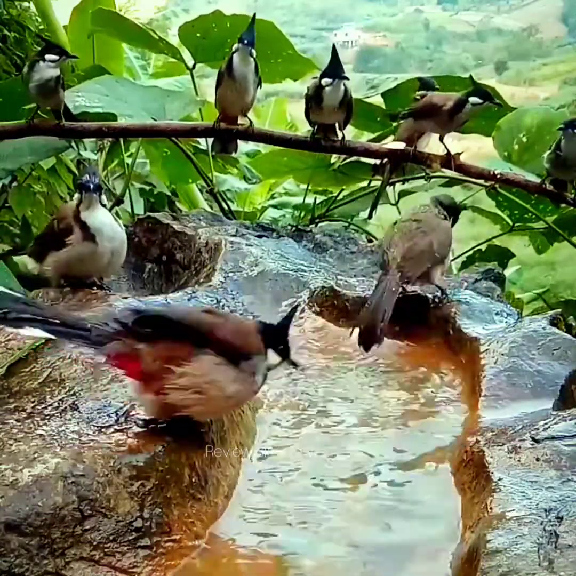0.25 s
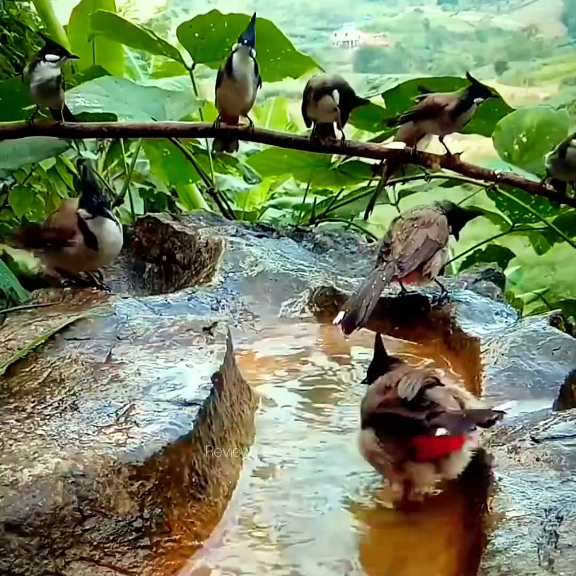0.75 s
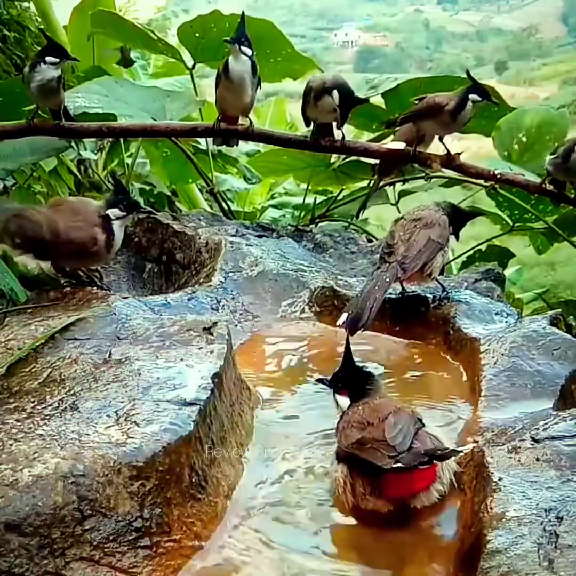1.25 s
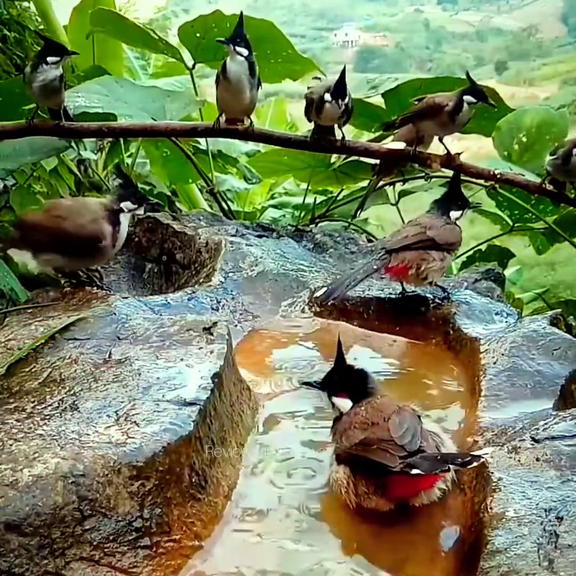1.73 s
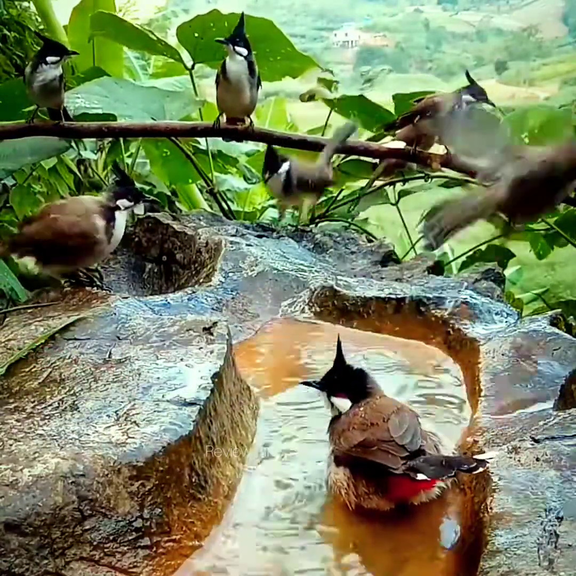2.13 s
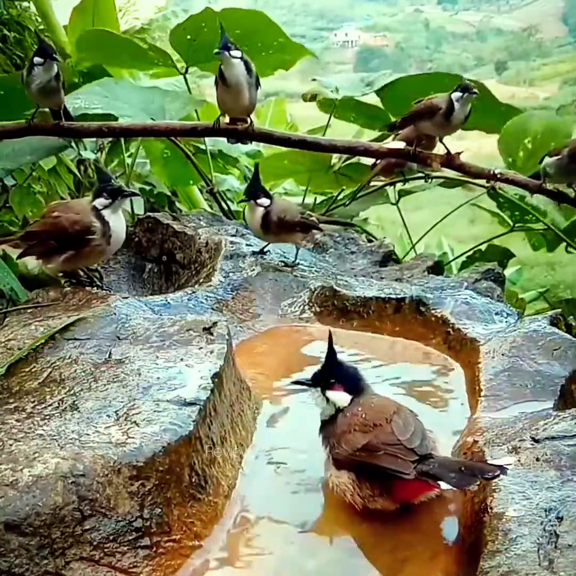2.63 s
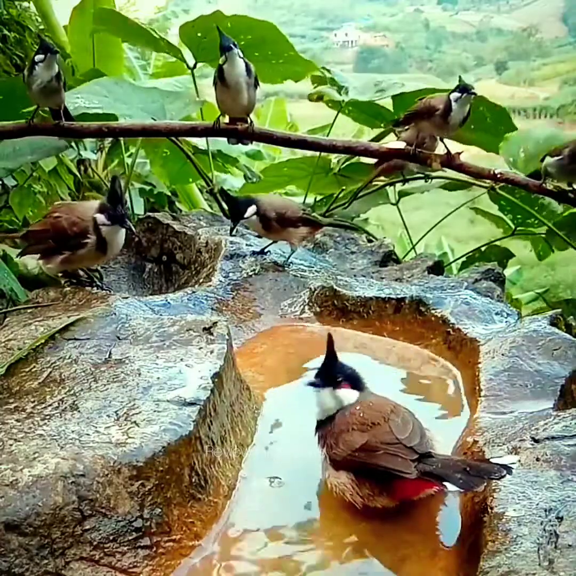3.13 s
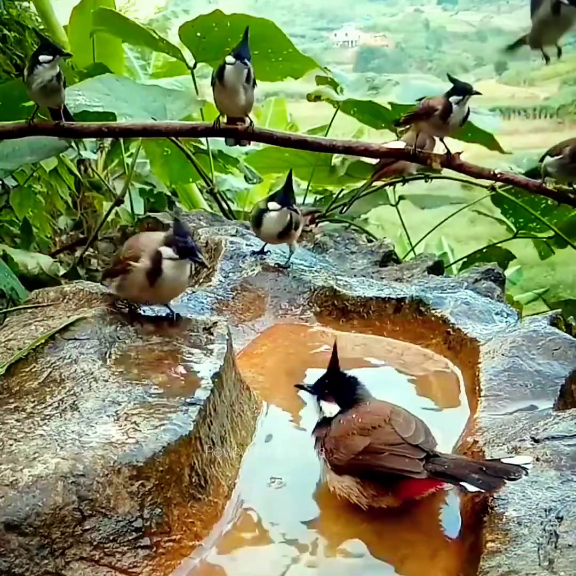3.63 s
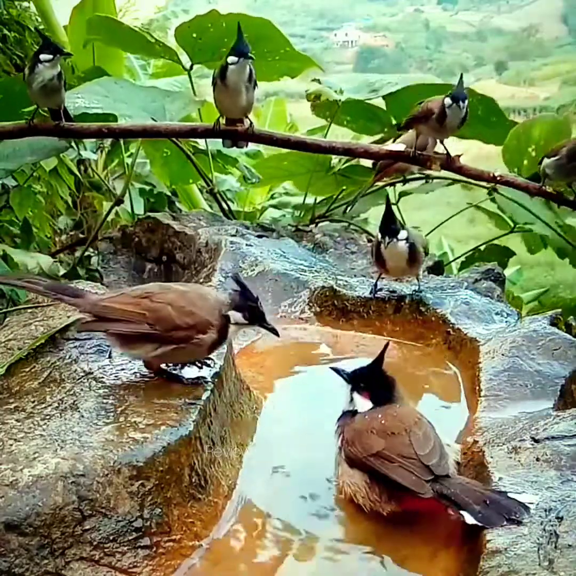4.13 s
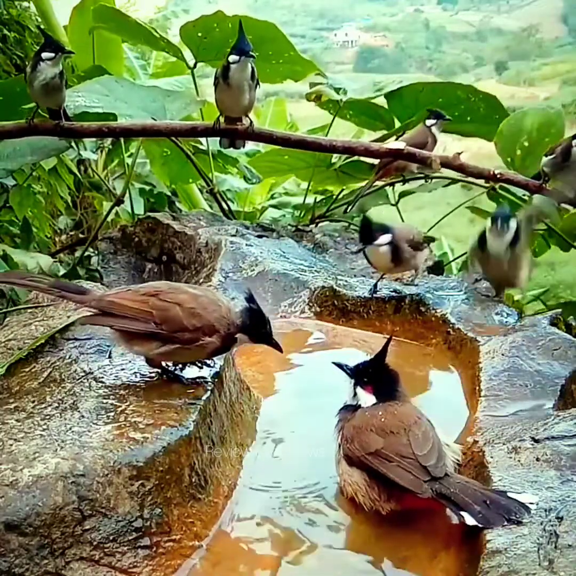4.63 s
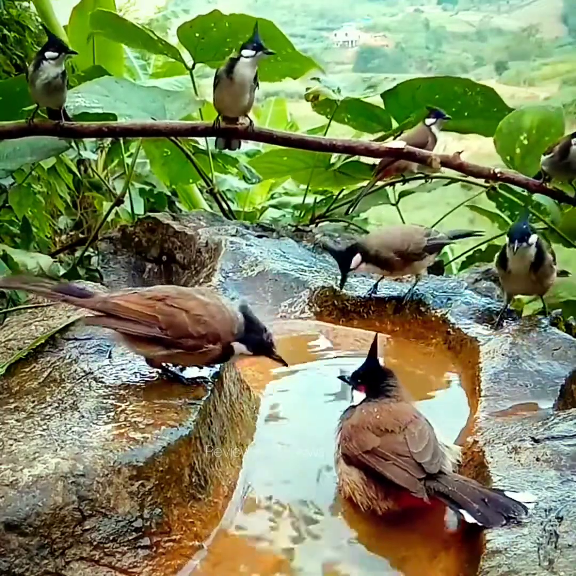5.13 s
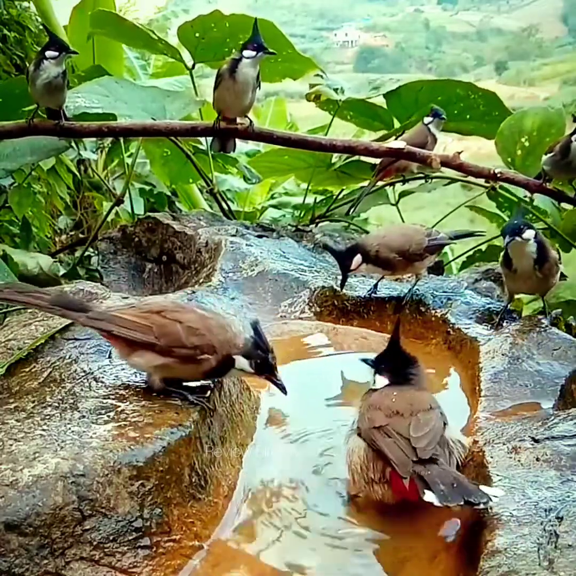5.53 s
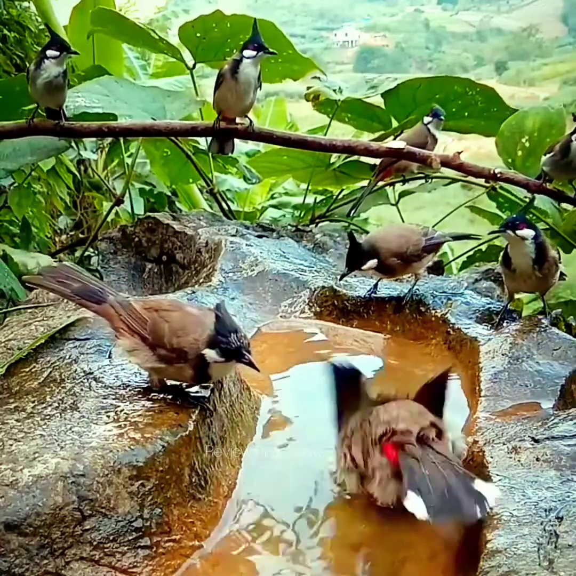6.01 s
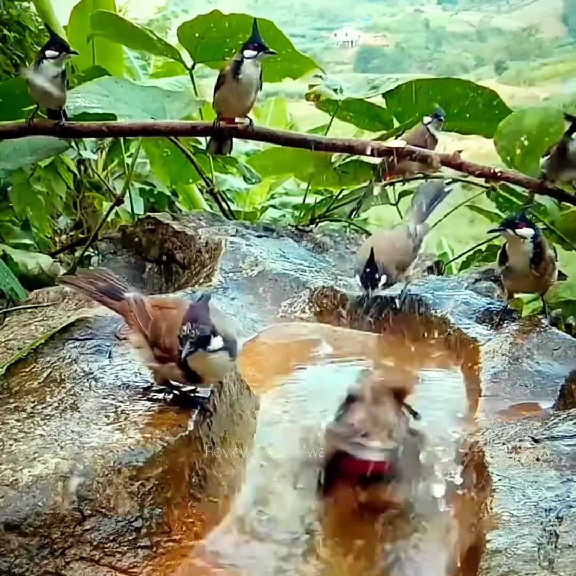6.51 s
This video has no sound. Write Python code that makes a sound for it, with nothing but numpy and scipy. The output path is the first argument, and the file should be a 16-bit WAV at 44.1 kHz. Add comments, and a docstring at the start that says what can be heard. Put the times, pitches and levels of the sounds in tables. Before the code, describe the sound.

Close to a phone microphone outdoors, a small bird flaps into a shallow rock pool with crisp wet slaps and spray. Quieter moments follow, with a hoarse chatter, then a flutter and a loud, bending chirp. Another flutter brings low, throbbing air bumps. A long lull holds a thin, high insect trill and faint distant calls before vigorous splashing breaks out near the end.

```python
"""A shallow rock pool outdoors, close to a phone, where small birds bathe, hop and flap.
Spray is a patter of noise grains and ringing bubbles; wings slap, clap and swish as shaped noise.
Low noise and wavering low tones are the air that wings push at the microphone. Near and far birds
whistle in bending tones, and one chatters in pips. An insect in the leaves trills in uneven bursts
of 6 kHz pulses. Echoes of the whistles and a soft noise of far-off leaves lie behind."""
import sys
import numpy as np
from scipy import signal
from scipy.fft import rfft, irfft, next_fast_len
from scipy.io import wavfile
from scipy.ndimage import uniform_filter1d

SR = 44100
rng = np.random.default_rng(int(sys.argv[2]) if len(sys.argv) > 2 else 0)


def digitize_waveform(pressure):
    """Quantize a signal to 16-bit integers and store it at the path in sys.argv[1].

    Rows of a 2-D input are taken as channels; values are limited to [-1, 1].
    """
    field = np.atleast_2d(pressure).T
    bounded = np.clip(field, -1, 1)
    quanta = np.round(bounded * 32767).astype(np.int16)
    wavfile.write(sys.argv[1], SR, quanta)


N = 298557  # samples, about 6.8 s

# tone colour of bright spray and wet feathers: (frequency [Hz], level [dB])
SPRAY_TREBLE = [(1400, -12.5), (2500, -8), (3400, -13.5), (6050, -1.5), (7290, -6.5), (9870, -29.5),
                (14300, -27.5), (15700, -33)]
# tone colour of the duller body of splashes: (frequency [Hz], level [dB])
SPRAY_BODY = [(200, -6), (340, -6), (480, -0.5), (780, -8.5), (1270, -2.5), (1500, -8.5), (2300, -14),
              (3500, -50)]


def undb(db):
    """Turn decibels into a gain."""
    return 10 ** (np.asarray(db) / 20)


def level(x, db):
    """Scale a sound so that its average (rms) level is db."""
    return x * undb(db) / np.sqrt(np.mean(x ** 2))


def colour(x, points):
    """Filter by (Hz, dB) points joined on a log-frequency axis."""
    size = next_fast_len(N + SR)
    hz, db = np.transpose(points)
    f = np.arange(size // 2 + 1) * SR / size + 1
    gain = undb(np.interp(np.log(f), np.log(hz), db, left=-90))
    return irfft(rfft(x, size) * gain, size)[:N]


def ring(x, hz, width):
    """A resonance: passes sounds near hz, with gain 1 at its centre."""
    return signal.lfilter(*signal.iirpeak(hz, hz / width, SR), x)


def walk(rate):
    """A smooth random wander: levels held for 1 / rate s, then averaged twice; spread near 1."""
    k = int(SR / rate)
    steps = np.repeat(rng.standard_normal(N // k + 1), k)
    return 1.3 * uniform_filter1d(uniform_filter1d(steps, k), k)[:N]


def patter(per_s, spread_db, tail_s):
    """Noise in overlapping droplets of very unequal size, each with a short tail."""
    hits = (rng.random(N) < per_s / SR) * undb(spread_db * rng.exponential(size=N))
    swell = signal.lfilter([1], [1, -np.exp(-1 / (tail_s * SR))], hits)
    return swell * rng.standard_normal(N)


def bubbles(per_s, low_hz, high_hz, cycles):
    """Trapped air rings for a few cycles and glides up; sizes differ widely."""
    hz = np.geomspace(low_hz, high_hz, 80)[:, None]
    turns = hz * np.arange(1000) / SR
    tones = np.sin(2 * np.pi * turns * (1 + 0.083 * turns / cycles))
    kinds = tones * turns * np.exp(-3 * turns / cycles)
    out = np.zeros(N + kinds.shape[1])
    for when, pitch, size in rng.random((int(per_s * N / SR), 3)):
        grain = kinds[int(pitch * len(kinds))]
        i = int(when * N)
        out[i:i + len(grain)] += 10 ** -size * grain
    return out[:N]


def patchy(x, depth_db, rate):
    """Make bands half an octave apart swell and dip, each on its own."""
    out = x
    for hz in 400 * 2 ** np.arange(0, 4.6, .5):
        change = undb(depth_db * (walk(rate) - .3)) - 1
        out = out + change * ring(x, hz, hz / 3)
    return out


def spray(treble_db, body_db):
    """Droplets and wet feathers: a bright patter, a duller body and bubbles, all driven in gusts."""
    bright = level(colour(patter(1400, 2.26, 0.0056), SPRAY_TREBLE), 6.76)
    bright = bright + level(bubbles(500, 2496, 7140, cycles=14), -5.5)
    dull = level(colour(patter(600, 3.8, 0.0094), SPRAY_BODY), -2.44)
    dull = dull + level(bubbles(350, 457.2, 2755, cycles=8.4), -7.0)
    wet = bright * undb(treble_db + 1.5 * walk(40)) + dull * undb(body_db + 1.4 * walk(19))
    return patchy(wet, depth_db=3, rate=80)


def bouts():
    """Busy spells set the drive of treble, body and air in dB: each rises and falls; powers add."""
    # bouts of bathing, hopping and flying: (full from [s], full to [s], rise [s], fall [s],
    # spray treble [dB], spray body [dB], air on the microphone [dB])
    bout_table = [(0, 0.054, .05, 0.055, -49, -33, -26), (0.074, 0.488, .1, 0.36, -40, -34, -32),
                  (0.188, 0.19, 0.032, 0.16, -22.5, -19.5, -42),
                  (0.403, 0.44, 0.033, 0.9, -46.5, -34.5, -31.5), (0.806, 0.832, 0.066, 0.2, -45, -31, -32),
                  (1.1, 1.303, 0.12, 0.076, -60.5, -47.5, -57.5), (1.54, 1.61, 0.19, 0.15, -46, -34.5, -30),
                  (2.021, 2.137, 0.079, 0.38, -40.5, -27.5, -34),
                  (2.094, 2.39, 0.59, 0.21, -48.5, -52, -30.5),
                  (2.787, 2.857, 0.061, 0.23, -34, -24.5, -21), (2.914, 3.1, 0.045, 0.34, -49, -43, -53),
                  (3.187, 3.39, 0.085, 0.14, -45.5, -32, -23),
                  (3.612, 3.683, 0.033, 0.062, -58.5, -48.5, -41.5),
                  (4.17, 4.6, 0.63, 0.25, -59.5, -52.5, -34.5), (4.504, 4.54, 0.14, 0.15, -48, -38, -41.5),
                  (5.669, 5.818, 0.37, 0.13, -67, -48, -47), (5.87, 6.01, 0.17, 0.12, -44.5, -40, -42),
                  (6.1, 6.555, 0.13, 0.1, -37.5, -32, -28), (6.162, 6.168, 0.14, 0.015, -20, -16.5, -22.5),
                  (6.21, 6.333, 0.05, 0.029, -27, -24, -24.5), (6.45, 6.4, 0.064, 0.093, -54, -37, -27),
                  (6.65, 6.7, 0.074, 0.17, -51.5, -40, -34)]
    # drive between bouts: (treble [dB], body [dB], air [dB])
    calm_db = (-67.5, -57, -53)
    slope_db = 20  # gained over a rise, lost over a fall
    t = np.arange(0, N, 64) / SR
    power = undb(calm_db)[:, None] ** 2
    for start, end, rise, fall, *db in bout_table:
        away = np.maximum((start - t) / rise, (t - end) / fall).clip(0)
        power = power + undb(np.array(db)[:, None] - slope_db * away) ** 2
    return [np.interp(np.arange(N) / SR, t, 10 * np.log10(p)) for p in power]


def slaps():
    """A wing meets water: a few milliseconds of noise that swell fast and die a little slower."""
    # wet wing slaps: (time [s], swell level [dB], body against treble [dB])
    slap_table = [(0.03, -21, -12), (0.069, -9.5, -21), (0.079, -9, -8), (0.162, -12, 6.5),
                  (0.176, -5.5, 3), (0.188, -2.5, 4), (0.1933, -10, 8), (0.222, -5, -11), (.204, -23, -7),
                  (0.215, -19, -8), (0.24, -8, -7), (0.412, -15.5, -1), (0.421, -13, -28.5),
                  (.475, -26, -8), (0.607, -27, -16), (.671, -35.5, -1), (0.793, -18, -17),
                  (1.1047, -23.5, -6), (2.0109, -3.5, -33.5), (2.019, -15.5, -15), (2.027, -8, -6),
                  (2.7933, -12, -8), (2.814, -16, 11), (2.8304, -9.5, -27), (2.9453, -19.5, -15),
                  (2.9652, -24, -9), (3.088, -28, 7), (3.124, -27, 6), (3.177, -31, 27), (3.2, -38, 30),
                  (3.237, -33, 29), (3.27, -33, 31), (3.278, -33, 29), (3.327, -38, 31), (3.373, -39, 32),
                  (3.429, -45, 31), (5.465, -52.5, 29.5), (5.9059, -9, -4.5), (5.993, -13.5, -8),
                  (6.004, -6, -23), (6.065, -19.5, 4), (6.094, -15, 6), (6.166, -2.5, 7.5),
                  (6.266, -18, -20), (6.284, -18, -20), (6.3253, -7.5, -1), (6.376, -24, 0),
                  (6.497, -27, 12), (6.512, -28, 12), (6.638, -32, 20)]
    treble, body = np.zeros(N), np.zeros(N)
    t = np.arange(1600) / SR
    shape = t / .002 * np.exp(1 - t / .002) + undb(-17) * np.exp(-t / .012)
    for s, db, body_db in slap_table:
        i = int(s * SR)
        treble[i:i + len(t)] += undb(db) * shape
        body[i:i + len(t)] += undb(db + body_db) * shape
    noise = rng.standard_normal(N)
    bright = treble * level(colour(noise, SPRAY_TREBLE), -5.5)
    dull = body * level(colour(noise, SPRAY_BODY), -18.0)
    return bright + dull


def claps():
    """Feathers strike feathers: a rounded burst of noise, most of it kept within one band."""
    # dry wing claps, duller on top than the slaps: (time of the crest [s], swell level [dB])
    clap_table = [(.8062, -6), (.82, -9.5), (.833, -18.5)]
    width_s, low_hz, high_hz = 0.0034, 2400, 7450
    t = np.arange(N) / SR
    swell = sum(undb(db) * np.exp(-((t - s) / width_s) ** 2) for s, db in clap_table)
    burst = swell * level(colour(rng.standard_normal(N), SPRAY_TREBLE), -4.0)
    band = signal.butter(6, [low_hz, high_hz], "band", fs=SR, output="sos")
    return signal.sosfilt(band, burst) + undb(-14) * burst


def swishes():
    """Wet feathers swish through a whole stroke: a rough, bright rush that swells and stops."""
    # wing strokes: (start [s], end [s], level [dB])
    swish_table = [(0.026, 0.11, -17.5), (1.998, 2.049, -16), (2.067, 2.148, -25.5), (2.728, 2.88, -22.5),
                   (6.085, 6.186, -18), (6.535, 6.577, -29)]
    t, swell = np.arange(N) / SR, np.zeros(N)
    for start, end, db in swish_table:
        share = np.clip((t - start) / (end - start), 0, 1)
        swell += undb(db) * np.sin(np.pi * share ** 1.36) ** 0.76
    return swell * level(colour(patter(1300, 1.1, 0.0025), SPRAY_TREBLE), 0)


def drops():
    """Single drops: a pocket of air in the water rings briefly and glides up."""
    # ringing drops: (time [s], starting pitch [Hz], level [dB])
    drop_table = [(.207, 1200, -18), (.277, 700, -28), (0.293, 1250, -21.5), (1.478, 590, -28.5),
                  (1.595, 567, -25), (2.059, 1260, -19), (2.069, 1250, -20), (2.082, 1260, -18),
                  (2.898, 890, -23.5), (5.92, 2120, -20), (6.2, 2150, -18), (6.214, 2200, -19),
                  (6.398, 2050, -20), (6.543, 1240, -24)]
    cycles, glide = 4, 0.12
    out = np.zeros(N)
    for s, hz, db in drop_table:
        age = hz * np.arange(1500) / SR / cycles
        tone = np.sin(2 * np.pi * cycles * age * (1 + glide * age))
        fade = 3 * age * np.exp(1 - 3 * age)
        out[int(s * SR):][:len(age)] += undb(db) * fade * tone
    return out


def air(drive_db):
    """Swirling air presses on the microphone: deep heaves, and quicker bumps from smaller eddies."""
    # tone colour of the heaves: (frequency [Hz], level [dB])
    air_colour = [(20, -39), (50, -10), (104, 1.5), (209, -2), (350, -22.5), (560, -17.5), (900, -60)]
    heaves = level(colour(patter(200, 0.97, 0.011), air_colour), 0.76)
    small = ring(ring(patter(90, 1.6, .006), 280, 260), 280, 260)
    bumps = level(small, -13) * undb(2.2 * walk(6))
    return (heaves + bumps) * undb(drive_db)


def thumps():
    """A single wing push bumps the microphone: a quick swell of low noise."""
    # wing pushes: (time [s], level [dB] ahead of the swell shape and noise)
    thump_table = [(0.029, -20), (3.169, -16.5), (3.223, -7), (3.269, -14), (3.33, -12), (3.364, -7),
                   (3.419, -21), (4.012, -21), (4.146, -22), (4.215, -18), (4.265, -18.5), (4.326, -19),
                   (4.385, -19.5), (4.44, -19.5), (4.65, -23.5), (4.761, -24), (4.837, -25.5), (6.413, -27),
                   (6.489, -22)]
    pushes, t = np.zeros(N), np.arange(2000) / SR
    for s, db in thump_table:
        pushes[int(s * SR)] = undb(db)
    swell = signal.fftconvolve(pushes, t / 0.0091 * np.exp(1 - t / 0.0074))[:N]
    return swell * level(ring(ring(rng.standard_normal(N), 170, 160), 170, 160), -7.0)


def throbs():
    """Beating wings make the air throb: a wavering low tone with peaked crests."""
    # spells of beating: (start [s], end [s], mean pitch [Hz], level [dB])
    throb_table = [(0.03, 0.052, 150, -21.5), (2.784, 2.89, 94.7, -27.5), (3.146, 3.501, 91.8, -18.5),
                   (4.42, 4.499, 124.8, -29), (6.395, 6.524, 75, -17)]
    pitch_wobble = .12  # share of the pitch
    t, out = np.arange(N) / SR, np.zeros(N)
    wobble, swell = walk(35), undb(2.3 * walk(30))
    for start, end, hz, db in throb_table:
        phase = 2 * np.pi * hz * np.cumsum(1 + pitch_wobble * wobble) / SR
        share = np.clip((t - start) / (end - start), 0, 1)
        arch = np.abs(np.sin(np.pi * share)) ** 0.8
        out += undb(db) * arch * (np.cos(phase) + undb(-6.5) * np.cos(2 * phase))
    return out * swell


def birds():
    """Near-pure whistles; a trill chops them into beats, rasp shakes them; returns direct, scattered."""
    # songs of near birds: (trill rate [Hz], rasp [0-1], rows of
    # (time [s], pitch [Hz], level [dB], trill depth [0-1]))
    near_songs = [ (91.3, 0.16, [(.856, 2430, -36, 0), (.877, 2420, -21, 0), (.885, 2450, -25, 0),
                  (.897, 3030, -22, 0.1), (.906, 2960, -28, .1), (.913, 2880, -24, .1),
                  (.917, 3045, -20, 0.2), (.931, 2970, -22, 0.1), (.936, 2404, -24, 0.14),
                  (.944, 2410, -28, .2), (.952, 2540, -19.5, 0), (.958, 2255, -23, .1),
                  (.965, 2080, -21, 0.06), (.988, 1240, -37, 0)]), (95, 0.12, [(1.622, 2653, -28, 0.3),
                  (1.655, 2670, -20.5, .05), (1.665, 2370, -29.5, 0.6), (1.712, 2322, -24.5, 0)]),
                  (91.7, 0.17, [(2.297, 2070, -24, 1), (2.31, 2055, -21, 0.5), (2.321, 2770, -9.5, 0.9),
                  (2.374, 2783, -7, 0.87), (2.382, 2877, -7.5, 0), (2.393, 2619, -2.5, 0),
                  (2.414, 2790, -5.5, 0.06)]), (150, 0.078, [(2.41, 2570, -5, 0.6),
                  (2.428, 2585, -8.5, 0.4), (2.44, 2360, -11, 0), (2.478, 2327, -13, 0.05)]),
                  (188, 0.097, [(2.497, 3360, -27.5, 0.2), (2.506, 3200, -20.5, 0.6),
                  (2.517, 3160, -23.5, .6), (2.524, 2840, -12.5, 0.65), (2.551, 2808, -16.5, 0.3),
                  (2.577, 2833, -12.5, 0.15), (2.59, 2830, -28.5, .1)]), ]
    out, rasp_noise = np.zeros((2, N)), walk(800)
    for trill_hz, rasp, rows in near_songs + far_notes():
        s, *columns = np.transpose(rows)
        span = slice(int(s[0] * SR), int(s[-1] * SR))
        t = np.arange(N)[span] / SR
        hz, db, depth = (np.interp(t, s, c) for c in columns)
        shake = rasp_noise[span]
        # each trill beat has two humps and bends upward in pitch
        beat = (t - s[0]) * trill_hz % 1
        humps = np.sin(np.pi * beat) * (1.15 - .7 * np.cos(4 * np.pi * beat)) * (1.4 - .8 * beat)
        bent_hz = hz + 520 * depth * (beat - .5) + 250 * rasp * shake[::-1]
        phase = 2 * np.pi * np.cumsum(bent_hz) / SR
        fade = np.clip(np.minimum(t - s[0], s[-1] - t) / .004, 0, 1)
        # the throat passes overtones best near one pitch, and only when the bird sings hard
        effort = np.clip((db + 16) / 5, 0, 1)
        throat = .03 + np.exp(-((hz - 2380) / 170) ** 2)
        harmonics = undb(-17.5) * np.sin(2 * phase) + undb(-26.5) * np.sin(3 * phase)
        voiced = (1 - depth + depth * humps) * (1 - rasp + rasp * shake)
        tone = np.sin(phase) + effort * throat * harmonics
        note = np.sqrt(2) * undb(db) * voiced * fade * tone
        # a loud bird is near, so less of it arrives by way of the surroundings
        scatter = undb(-1.1 * max(db.max() + 18.0, 0))
        out[:, span] += note * np.array([[1], [scatter]])
    return out


def far_notes():
    """Notes of birds further off: each glides evenly, swells to a peak past halfway and fades."""
    # far notes: (start [s], length [s], first pitch [Hz], last pitch [Hz], peak level [dB], rasp [0-1])
    far_table = [(1.663, 0.062, 1920, 1915, -36.5, 0.04), (1.926, 0.036, 2355, 2570, -34, 0.17),
                 (1.948, 0.041, 2160, 2220, -33.5, 0.1), (3.659, 0.046, 2444, 2400, -48, 0.1),
                 (3.722, 0.069, 3490, 3230, -53.5, .5), (3.812, .05, 2080, 2060, -50, 0.14),
                 (3.817, 0.092, 2810, 2720, -41.5, 0.27), (3.863, 0.05, 2530, 2250, -39.5, 0.33),
                 (3.909, 0.091, 2230, 2160, -51.5, 0.4), (3.984, 0.034, 2494, 2642, -37.5, 0.03),
                 (4.016, 0.07, 2287, 2240, -38.5, 0.56), (4.066, 0.081, 1910, 1840, -38.5, 0.15),
                 (4.19, 0.056, 1850, 1820, -52.5, 0.1), (4.336, 0.066, 2205, 2090, -34, .55),
                 (4.432, 0.075, 2664, 2610, -48, 0.05), (5.262, 0.07, 1460, 1450, -46, 0.57),
                 (5.287, 0.04, 2590, 2541, -42, 0.42), (5.306, 0.069, 1930, 1886, -46.5, 0.3),
                 (5.448, 0.052, 1880, 1930, -49, .5), (5.474, 0.088, 2030, 2164, -47, 0.3),
                 (5.526, 0.048, 3200, 2690, -50, .5), (5.55, 0.042, 1920, 1930, -52, 0),
                 (6.68, 0.04, 2104, 2030, -37, 0.2)]
    trill_hz, trill_depth = 89.7, 0.19
    shape = [(0, -3), (0.58, 0), (1, -4)]  # (share of the length, dB against the peak)
    songs = []
    for s, length, hz, last_hz, db, rasp in far_table:
        rows = [(s + share * length, hz + share * (last_hz - hz), db + drop_db, trill_depth)
                for share, drop_db in shape]
        songs.append((trill_hz, rasp, rows))
    return songs


def chatter():
    """A bird's low chatter: hoarse, unevenly bent pips on several strands with staggered starts."""
    # strands: (first pip [s], pips [count, rounded], first pitch [Hz], last pitch [Hz],
    # first level [dB], last level [dB])
    strand_table = [(1.496, 5.9, 2000, 1760, -26, -25), (1.509, 4.4, 2300, 2100, -28, -25),
                    (1.517, 5, 1290, 1270, -29, -21.5), (1.531, 2.2, 740, 730, -21, -21),
                    (1.532, 4.9, 2630, 2690, -39.5, -36), (1.57, 3.9, 3500, 3400, -38, -40.5)]
    pips_hz = 66  # pips a second on each strand
    out = np.zeros(N)
    t = np.arange(-500, 500) / SR
    for start, count, hz, last_hz, db, last_db in strand_table:
        for k, chance in enumerate(rng.standard_normal(int(round(count)))):
            share = k / (count - 1)
            i = int((start + k / pips_hz + .001 * chance) * SR) - len(t) // 2
            pitch = hz + share * (last_hz - hz)
            pip = np.exp(-(t / 0.004) ** 2) * np.sin(2 * np.pi * pitch * t * (1 + 3 * chance * t))
            out[i:i + len(t)] += undb(db + share * (last_db - db) + 1.5 * chance) * pip
    return out * (1 + .6 * walk(900))


def insect():
    """Each stroke is a short swell of a sagging 6 kHz tone; a weaker one follows at half period."""
    # bursts: (first stroke [s], strokes [count], first delayed stroke [index from 0; 0 for none])
    burst_table = [(0.032, 2, 0), (0.124, 3, 0), (0.259, 2, 0), (0.315, 3, 0), (0.431, 4, 0), (0.576, 4, 0),
                   (0.746, 3, 1), (.878, 4, 0), (1.027, 3, 1), (1.175, 3, 0), (1.276, 4, 0), (1.427, 3, 2),
                   (1.557, 3, 0), (1.694, 3, 1), (1.848, 4, 0), (1.968, 2, 0), (2.11, 6, 0), (2.246, 6, 0),
                   (2.432, 4, 2), (2.562, 3, 0), (2.642, 5, 0), (2.853, 3, 0), (2.95, 8, 6), (3.123, 1, 0),
                   (3.193, 2, 1), (3.254, 5, 0), (3.405, 7, 3), (3.592, 6, 0), (3.702, 5, 2),
                   (3.802, 13, 0), (4.05, 5, 2), (4.151, 9, 7), (4.343, 2, 0), (4.377, 3, 0),
                   (4.445, 14, 1), (4.727, 5, 3), (4.828, 32, 31), (5.511, 2, 0), (5.548, 9, 8),
                   (5.725, 2, 0), (5.826, 2, 0), (5.859, 3, 0), (5.984, 1, 0), (6.03, 3, 0), (6.2, 1, 0),
                   (6.247, 3, 0), (6.47, 1, 0), (6.514, 2, 0), (6.657, 4, 0)]
    tone_hz, strokes_hz = 6027, 51.0
    stroke_db, late_s = -22, 0.0075  # level ahead of the swell shape and final gain; delay
    stumble_db = 6  # the weak stroke ahead of a late one is stronger
    strokes = np.zeros(N + SR, complex)
    for start, count, late in burst_table:
        chance = rng.standard_normal((count, 3))
        k = np.arange(count)
        delay = late_s * ((k >= late) & (late > 0))
        at = start + k / strokes_hz + delay + 0.00015 * chance[:, 0]
        size = undb(stroke_db + chance[:, 1]) * np.exp(1j * np.pi * chance[:, 2])
        weak_db = -12 + 2.5 * chance[:, 0] + stumble_db * (k == late - 1)
        strokes[(at * SR).astype(int)] += size
        strokes[((at + .5 / strokes_hz) * SR).astype(int)] += size * undb(weak_db)
    t = np.arange(-400, 800) / SR
    swell = np.exp(-(t / 0.0031) ** 2) + undb(-7) * np.exp(-((t - .004) / 0.002) ** 2)
    sag_hz = -130 * np.tanh(t / 0.0072)  # from above the tone to below it
    shape = swell * np.exp(2j * np.pi * np.cumsum(sag_hz) / SR)
    slow = signal.fftconvolve(strokes, shape)[400:400 + N]
    rough = 1 + 0.14 * walk(600)
    tone = slow * rough * np.exp(2j * np.pi * tone_hz * np.arange(N) / SR)
    # others of its kind, further off, blur into a narrow band
    band = ring(ring(ring(rng.standard_normal(N), 5820, 420), 5820, 420), 5820, 420)
    chorus = level(band * undb(2.0 * walk(2.2)), -37.5)
    # a faint hissy octave follows the strokes
    hiss = ring(ring(rng.standard_normal(N), 12150, 850), 12150, 850)
    octave = level(hiss * (np.abs(slow) + .04), -67)
    return undb(1) * tone.real + octave + chorus


def echoes(x):
    """Rocks, trunks and leaves scatter the sound back as a fading wash."""
    fade_s, echo_db = .33, -9  # time to fade by 60 dB; gain of the wash
    leaf_smear, leaf_hz = .95, 450  # stirring leaves roughen what they scatter
    t = np.arange(SR // 2) / SR
    fade = np.exp(-np.log(1000) * t / fade_s) * np.clip(t / 0.011, 0, 1)
    tail = rng.standard_normal(len(t)) * fade
    tail = tail / np.sqrt(np.sum(tail ** 2))
    rough = x * (1 + leaf_smear * walk(leaf_hz))
    return undb(echo_db) * signal.fftconvolve(rough, tail)[:N]


def hillside():
    """Far-off leaves and valley noise: coloured noise that swells slowly."""
    # tone colour of the background: (frequency [Hz], level [dB])
    hill_colour = [(40, -12), (160, 2), (370, -13.5), (880, -20.5), (1500, -27), (2040, -13.5),
                   (5000, -14.5), (6600, -28), (8500, -41), (10500, -63), (15700, -47)]
    return level(colour(rng.standard_normal(N), hill_colour), -59.5) * undb(0.53 * walk(4.1))


def scene():
    """Add all sources into one channel."""
    treble_db, body_db, air_db = bouts()
    bath = spray(treble_db, body_db) + slaps() + claps() + swishes() + drops()
    wing_air = air(air_db) + thumps() + throbs()
    direct, scattered = birds()
    calls = direct + chatter() + echoes(scattered)
    return (bath + wing_air + calls + insect() + hillside())[None]


def record(dry):
    """The housing rings; the phone turns loud passages down, rounds the peaks and cuts the top."""
    # hollows in front of the microphone: (frequency [Hz], width [Hz], added level [dB])
    hollows = [(1204, 45, -2), (1280, 40, 4), (7170, 334, -2.5)]
    knee_db, squeeze, follow_s = -21, 0.26, 0.14  # gain control: level, strength, reaction time
    top_hz = 15750
    heard = dry + sum(undb(db) * ring(dry, hz, width) for hz, width, db in hollows)
    keep = np.exp(-1 / (follow_s * SR))
    power = signal.lfilter([1 - keep], [1, -keep], heard ** 2)
    heard = heard * (1 + power / undb(knee_db) ** 2) ** -squeeze
    rounded = np.tanh(.8 * heard) / .8
    return signal.sosfilt(signal.ellip(10, .2, 80, top_hz, fs=SR, output="sos"), rounded)


dry = scene()
out = record(dry)
digitize_waveform(out)
```